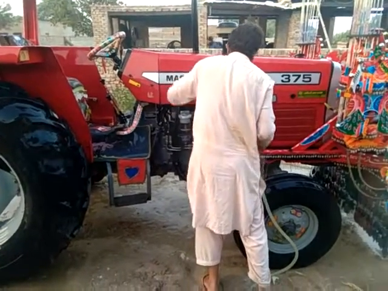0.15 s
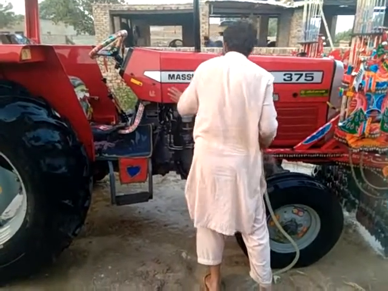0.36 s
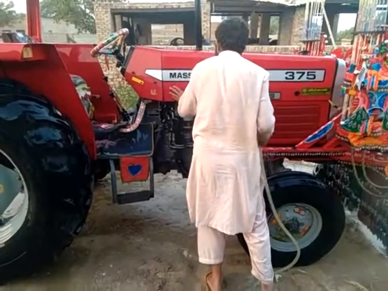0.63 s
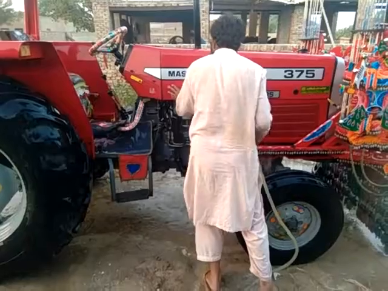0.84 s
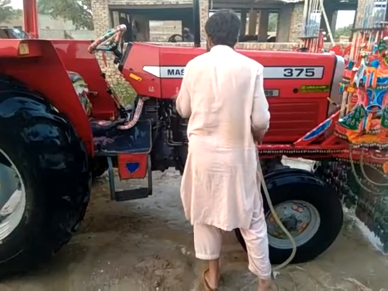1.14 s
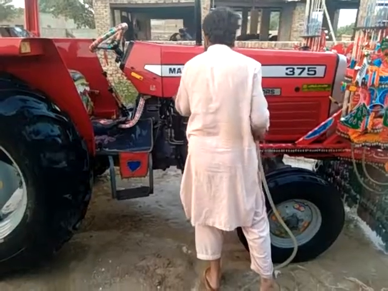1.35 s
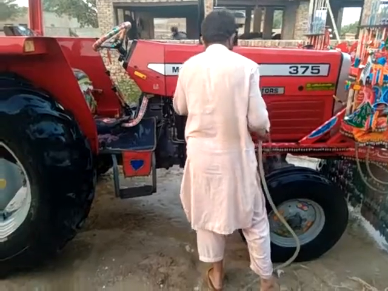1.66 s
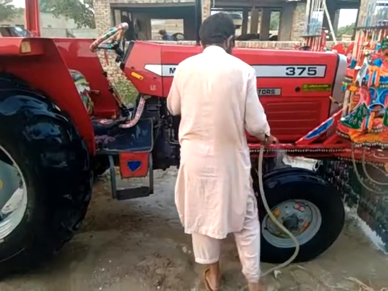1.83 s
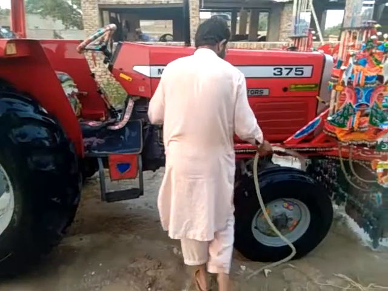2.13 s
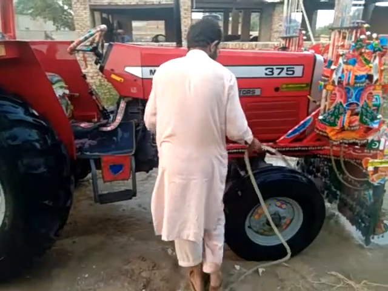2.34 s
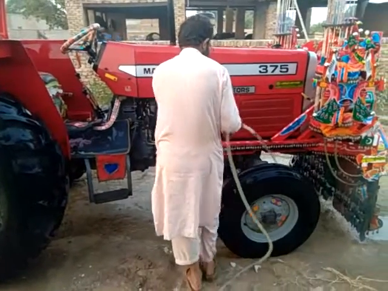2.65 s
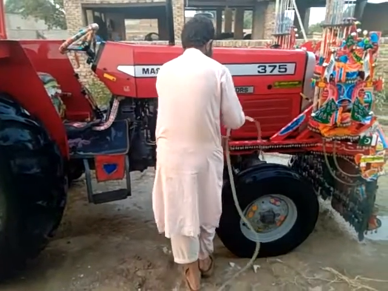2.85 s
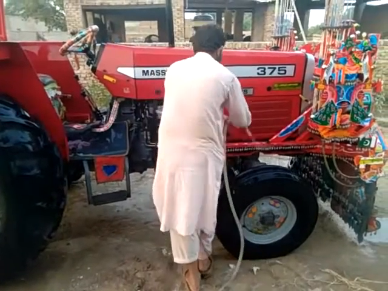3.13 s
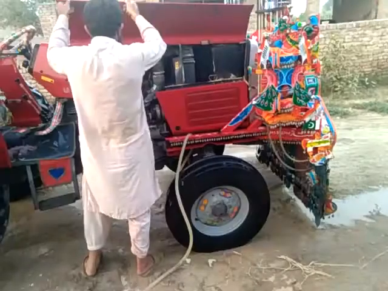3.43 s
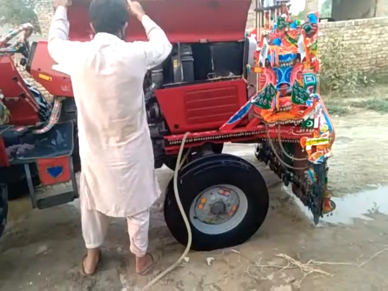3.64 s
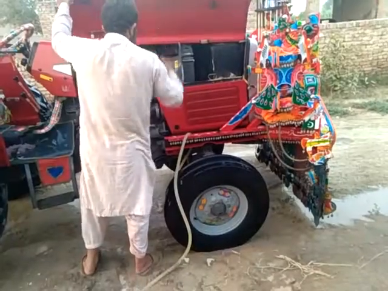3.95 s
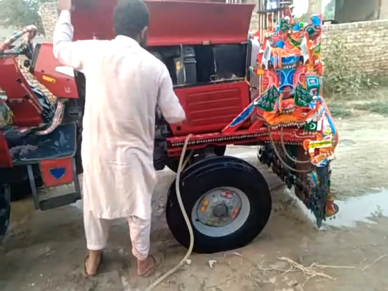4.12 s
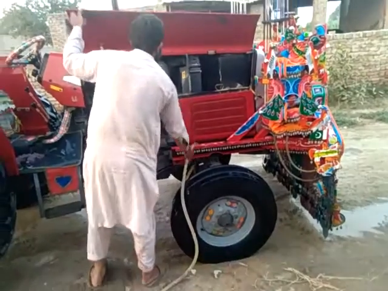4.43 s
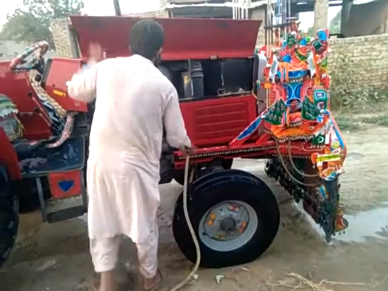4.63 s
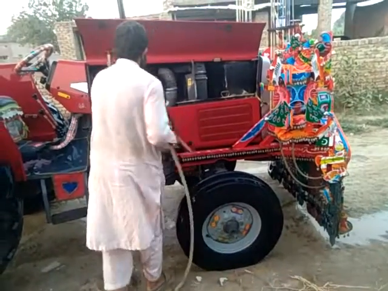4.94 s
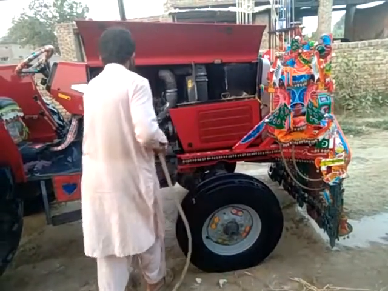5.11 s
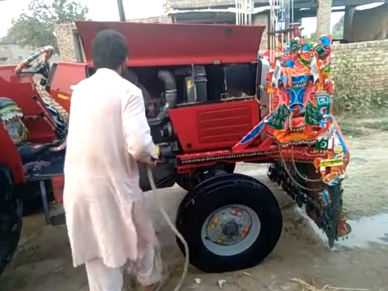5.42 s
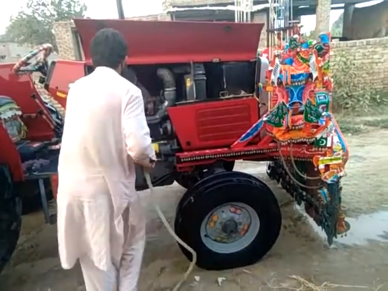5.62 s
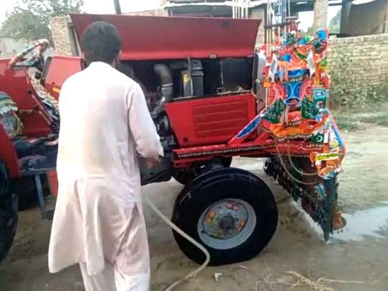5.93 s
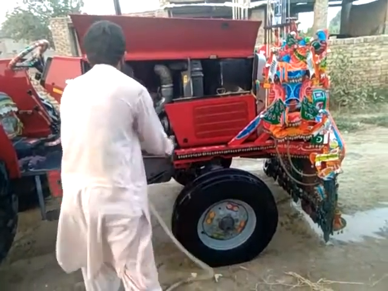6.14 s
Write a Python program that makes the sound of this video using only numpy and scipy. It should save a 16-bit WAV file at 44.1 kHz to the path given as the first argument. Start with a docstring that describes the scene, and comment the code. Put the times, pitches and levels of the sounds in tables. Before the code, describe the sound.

Close, uneven hose spray spatters on metal bodywork and muddy ground, fine hiss above a dull run-off. Sharp slaps of water and bubbly blips punctuate it. After the water thins to a dribble, a faint hinge squeak and soft knock precede one loud steel bang with a short clattering ring. Lesser thuds follow, then isolated spurts. Outdoors, one microphone, weak bass, and a far wavering engine drone.

```python
"""Water from a garden hose spatters over a tractor and the wet ground of an open yard: gush after gush
of ticking drops, hiss and dull run-off over a trickle, with ringing slaps and gliding bubbles.
The flow slackens, the raised sheet-steel bonnet bangs against its stop among lesser knocks and rings
through its panel modes, its hinge squeaks faintly, then separate spurts follow in a new colour.
Behind lie a low noise rumble and a far engine of wavering harmonics; a suppressor ducks the bass."""
import sys
import numpy as np
from scipy import signal
from scipy.io import wavfile
from scipy.ndimage import uniform_filter1d

SR = 44100
rng = np.random.default_rng(int(sys.argv[2]) if len(sys.argv) > 2 else 0)


def unload_wav(signal):
    """Save mono or channel-first audio to the path in sys.argv[1] as 16-bit WAV at rate SR, clipped to [-1, 1]."""
    wavfile.write(
        sys.argv[1],
        SR,
        np.round(np.clip(np.atleast_2d(signal).T, -1, 1) * 32767).astype(np.int16),
    )


N = 276507
TIME = np.arange(N) / SR   # seconds

# gushes of the hose, levels before the layer trims:
# start_s, length_s, splatter_db, brightness_db (spray over splatter), wash_db (run-off)
GUSHES = [(0.01, 0.21, -51, -2, -60.5), (0.308, 0.37, -48, -3, -56), (0.799, 0.047, -51, 0.5, -55),
          (0.938, 0.22, -51.5, 1, -54.5), (1.167, 0.061, -44, -4.5, -57), (1.431, 0.075, -49.5, -1, -55.5),
          (1.574, 0.038, -42.5, -7, -58), (1.682, 0.37, -46.5, -2.5, -60), (2.067, 0.089, -51.5, -3.5, -61),
          (2.234, 0.18, -46.5, -1, -58), (2.431, 0.16, -40, -3.5, -57.5), (2.697, .022, -44.5, -9, -65),
          (2.794, 0.093, -39.5, -10, -54.5), (2.96, 0.35, -42.5, -6.5, -55.5),
          (3.362, 0.043, -42.5, -5, -52.5), (3.416, 0.16, -56, -11, -53.5), (3.94, 0.44, -53.5, -7, -54),
          (4.408, 0.089, -54, -10.5, -53.5), (4.664, 0.062, -49.5, -6.5, -56.5),
          (4.751, 0.078, -49.5, -5.5, -51), (5.004, 0.067, -57, -2, -60), (5.324, 0.1, -57, 0, -56.5),
          (5.441, .065, -46.5, 2, -49), (5.534, 0.13, -50, 2, -54.5), (5.705, .13, -48, 1, -53.5),
          (5.757, 0.022, -41.5, 0.5, -46), (5.873, 0.028, -55.5, 5.5, -54.5), (6.069, .025, -59.5, 3, -66),
          (6.093, 0.095, -49.5, -3.5, -52.5)]
# trickle between the gushes, only a dribble once the hose is let go: time_s, level_db
TRICKLE = [(0, -54.5), (0.75, -55), (0.92, -60), (1.2, -54), (2.0, -53), (2.22, -59.5), (2.45, -55.5),
           (3.4, -53), (3.65, -72.5), (4.95, -75.5), (5.25, -70), (6.27, -74)]
# colour of the water on tractor and ground: pitch_hz, density_db (relative, per Hz)
WATER_COLOUR = [(240, -38), (400, -11.5), (526, -18), (576, -6.5), (670, -11.5), (1070, -10.5),
                (1610, -7.5), (2390, -2.5), (3450, -7), (4070, -8.5), (5950, -13.5), (8300, -25.5),
                (15000, -39)]
# colour of the late spurts: pitch_hz, density_db (relative, per Hz)
SPURT_COLOUR = [(240, -34), (400, -10.5), (518, -8), (602, 0), (690, -3.5), (756, -6.5), (854, -8.5),
                (2150, -1), (3890, -12), (4600, 1), (5770, -8.5), (8180, -22), (15000, -29)]
# gobs of water slapping down: start_s, level_db (before click and droplet trims), pitch_hz, scatter_s
SLAPS = [(0.171, -30.5, 2630, 0.015), (0.306, -36, 2720, .01), (0.636, -33, 2600, 0.017),
         (0.6852, -32, 5440, 0.015), (0.995, -33.5, 2840, 0.0087), (1.0537, -28.5, 2660, 0.016),
         (1.194, -30, 2120, 0.029), (1.2426, -30, 4000, .012), (1.3026, -30.5, 3140, 0.014),
         (1.6884, -34, 4460, .012), (2.154, -32.5, 3300, 0.013), (2.322, -23.5, 2790, 0.02),
         (2.365, -31.5, 2020, 0.0085), (2.509, -35, 2620, 0.049), (2.792, -16.5, 3880, 0.0057),
         (2.8125, -29, 1850, 0.012), (2.853, -26, 2530, 0.017), (5.4786, -24, 1643, 0.0067),
         (6.126, -25, 4840, 0.017), (6.184, -30, 4300, 0.0087)]
# larger bubbles and gurgles: start_s, pitch_hz, level_db, t60_s, glide (octaves per s)
BUBBLES = [(.315, 290, -41, 0.14, 4), (.505, 261, -46, 0.38, -3.5), (.695, 335.6, -45.5, 0.22, -3.5),
           (0.99, 348, -48.5, .45, -0.5), (1.0, 770, -50.5, 0.81, -1), (1.58, 2597, -32, 0.13, 1),
           (1.723, 2210, -25, 0.041, -14), (1.738, 2360, -20.5, 0.08, -2), (1.777, 1980, -34, 0.17, -1.4),
           (4.674, 3200, -44, 0.13, 1), (5.477, 1675, -17, 0.029, 10)]
# knocks of the bonnet: start_s, level_db (relative), hardness_hz (treble corner of the contact)
KNOCKS = [(3.764, -43.5, 5000), (3.899, -22, 905), (3.9025, 4, 12000), (3.941, -6, 220), (4.238, -16, 445),
          (4.436, -33, 2990)]
# strong modes of the bonnet panel: pitch_hz, level_db (relative), t60_s
BONNET_MODES = [(174, -39.5, 0.66), (276.4, -47, 1), (313, -31, 0.83), (343, -36, 0.7), (432, -28.5, 0.44),
                (459.3, -27, 0.54), (595, -33.5, 0.48), (779, -26.5, 0.47), (854, -27, 0.64),
                (902, -27.5, 0.19), (913, -26, 0.52), (961, -22.5, 0.47), (994, -28, 0.54),
                (1210, -31, 0.44), (1193, -35.5, 0.5), (1289, -16.5, 0.15), (1585, -34.5, 0.62),
                (1660, -35, 0.63), (1820, -41, 0.82), (2010, -28, 0.44), (2066, -35.5, 0.97),
                (2610, -26, 0.21), (2750, -24.5, 0.092), (3460, -31, 0.081), (3870, -26, 0.12),
                (3930, -23.5, 0.095), (4030, -17.5, 0.086), (5180, -24.5, 0.16), (5100, -32.5, 0.11)]
# colour of the rattle at each knock: pitch_hz, density_db (relative, per Hz)
CLATTER_COLOUR = [(60, -23), (150, -8), (420, -6), (620, -10.5), (900, -1.5), (1500, -5.5), (2100, -1),
                  (3000, -11.5), (4000, -4.5), (5400, -15.5), (8000, -19), (15000, -45)]
# colour of the panel's dense weak modes: pitch_hz, density_db (relative, per Hz)
SHUDDER_COLOUR = [(60, -12.5), (115, -17.5), (170, 11), (220, -8.5), (320, 0), (620, -3.5), (900, -4),
                  (1150, -1), (2100, -2), (3200, -18.5), (6000, -25), (15000, -48.5)]
# dying of those dense modes: pitch_hz, t60_s
SHUDDER_T60 = [(100, 0.76), (350, 1), (900, 0.71), (2000, 0.62), (5000, 0.73), (15000, 0.27)]
# squeaks of the bonnet hinge: centre_s, half_length_s (to 1/e), pitch_hz, level_db
SQUEAKS = [(3.51, 0.068, 1370, -55), (4.29, 0.14, 1590, -50)]
# background levels: time_s, rumble_db, engine_db
YARD_LEVELS = [(0, -56, -54), (1.0, -54, -60.5), (1.55, -53.5, -53.5), (2.5, -56.5, -60), (3.0, -55.5, -51),
               (3.3, -48.5, -51), (3.55, -57, -61.5), (4.7, -60.5, -66), (6.27, -57.5, -66.5)]
# colour of the yard rumble: pitch_hz, density_db (relative, per Hz)
RUMBLE_COLOUR = [(35, -3), (50, -8.5), (70, -5), (100, -0.5), (155, -5.5), (205, -12.5), (325, -6.5),
                 (430, -14.5)]
# far engine partials: multiple (of the firing rate), level_db (relative)
ENGINE_PARTIALS = [(1, 5), (2, -6), (3, -2), (6, -7)]

OPENED_S, AIMED_IN_S = 3.9, 4.9   # bonnet open; jet aimed into the engine bay
ATTACK_S, SAG_DB_PER_S, RELEASE_DB_PER_S = 0.01, 8, 296   # a gush swells, sags, then dies
USUAL_GUSH_DB = -49.5   # level of an ordinary gush, from which the trickle's hiss falls away
TRICKLE_SPRAY_DB, TRICKLE_WASH_DB = 1, -4
TRICKLE_SPRAY_FOLLOWS = 1.36   # dB of hiss per dB of trickle, so the hiss fades faster
USUAL_SCATTER_S = 0.011   # a gob that scatters for longer lands more softly
ENGINE_HZ = 97.7   # mean firing rate
USUAL_ENGINE_DB, OVERTONES_FOLLOW = -56.5, 0.82   # overtones come up as the engine gets louder
CUTOFF_HZ = 15650


def from_db(db):
    """Decibels to gain."""
    return 10 ** (np.asarray(db) / 20)


def rms_one(x):
    """Scales to rms 1."""
    return x / np.sqrt(np.mean(x ** 2) + 1e-20)


def in_time(rows):
    """Each column of a curve at every sample."""
    s, *columns = np.transpose(rows)
    return [np.interp(TIME, s, c) for c in columns]


def at_hz(points, hz):
    """Reads a table on a log-frequency axis."""
    table = np.array(points)
    return np.interp(np.log(hz), np.log(table[:, 0]), table[:, 1])


def drift(rate_hz):
    """Slow random wander of spread 1: low-passed noise drawn once every 40 samples."""
    r = np.exp(-80 * np.pi * rate_hz / SR)
    noise = rng.standard_normal(N // 40 + 2002)
    slow = signal.lfilter([1], [1, -2 * r, r * r], noise)[2000:]   # past the settling
    return np.interp(np.arange(N) / 40, np.arange(len(slow)), rms_one(slow))


def band(x, low_hz, high_hz):
    """Gentle band-pass."""
    edges = [low_hz, min(high_hz, 0.45 * SR)]
    return signal.sosfilt(signal.butter(2, edges, "band", fs=SR, output="sos"), x + 1e-18)


def thirds(low_hz, high_hz):
    """Roughly third-octave bands: (low edge, centre, high edge)."""
    edges = np.geomspace(low_hz, high_hz, round(3 * np.log2(high_hz / low_hz)) + 1)
    return zip(edges, np.sqrt(edges[1:] * edges[:-1]), edges[1:])


def resonance(x, hz, width_hz):
    """One two-pole resonance with a gain of about 1 on top."""
    r = np.exp(-np.pi * width_hz / SR)
    poles = [1, -2 * r * np.cos(2 * np.pi * hz / SR), r * r]
    return signal.lfilter([1 - r, 0, r - 1], poles, x + 1e-18)


def add(track, s, sound):
    """Mixes a sound into the track at time s."""
    at = max(round(s * SR), 0)
    track[at:at + len(sound)] += sound[:N - at]


def drops(per_s, spread_db, size=N):
    """Random clicks of either sign, many small and a few large; rms 1."""
    heights = from_db(spread_db * np.minimum(rng.exponential(1, size), 4))
    signs = rng.choice([-1, 1], size)
    return rms_one(heights * signs * (rng.random(size) < per_s / SR))


def stream(wash_db=-1.14, splatter_db=0.0, spray_db=-0.25):
    """Fat drops splatter, fine spray hisses, the run-off washes dully."""
    splatter_gain, spray_gain, wash_gain = flow()
    low, middle, high = thirds(400, 1400), thirds(1400, 3600), thirds(3600, 16000)
    wash = spatter(low, per_s=1000, spread_db=1.5, mist_db=2.0, fizz_db=-9, patchy_db=0.9, clump_db=0.15)
    splatter = spatter(middle, per_s=700, spread_db=1.0, mist_db=1.5, fizz_db=-6,
                       patchy_db=3.0, clump_db=1.37)
    spray = spatter(high, per_s=2400, spread_db=0.5, mist_db=1.5, fizz_db=-10.5,
                    patchy_db=2.0, clump_db=2.47)
    low_water = (wash * from_db(wash_db) + drumming()) * wash_gain
    return low_water + splatter * splatter_gain * from_db(splatter_db) + spray * spray_gain * from_db(spray_db)


def flow():
    """Gains of splatter, spray and wash: every gush has one envelope and adds its power to the trickle."""
    trickle_db, = in_time(TRICKLE)
    hiss_db = USUAL_GUSH_DB + TRICKLE_SPRAY_DB + TRICKLE_SPRAY_FOLLOWS * (trickle_db - USUAL_GUSH_DB)
    power = from_db([trickle_db, hiss_db, trickle_db + TRICKLE_WASH_DB]) ** 2
    t = TIME[:SR]
    for s, length, level_db, bright_db, wash_db in GUSHES:
        fall_db = SAG_DB_PER_S * t + RELEASE_DB_PER_S * np.maximum(t - length, 0)
        envelope = np.minimum(t / ATTACK_S, 1) * from_db(-fall_db)
        for layer, layer_db in zip(power, (level_db, level_db + bright_db, wash_db)):
            add(layer, s, (from_db(layer_db) * envelope) ** 2)
    return np.sqrt(power)


def spatter(bands, per_s, spread_db, mist_db, fizz_db, patchy_db, clump_db):
    """Drops tick in all bands at once, leave tiny ringing bubbles and lie on a smooth mist; rms 1."""
    impacts, clumps, out, power = drops(per_s, spread_db), drift(31), 0, 0
    for k, (low, hz, high) in enumerate(bands):
        mist = from_db(mist_db) * rng.standard_normal(N)
        ticks = band(impacts * (-1) ** k + mist, low, high)
        fizz = sum(resonance(drops(45, 6.2), pitch, pitch / 22) for pitch in rng.uniform(low, high, size=3))
        grain = rms_one(rms_one(ticks) + from_db(fizz_db) * rms_one(fizz))
        # aimed into the open engine bay the water meets other surfaces and changes colour
        density_db = np.where(TIME < AIMED_IN_S, at_hz(WATER_COLOUR, hz), at_hz(SPURT_COLOUR, hz))
        colour = np.sqrt(high - low) * from_db(density_db)
        out = out + grain * colour * from_db(patchy_db * drift(25))
        power = power + colour ** 2
    return rms_one(out / np.sqrt(power) * from_db(clump_db * clumps))   # the jet breaks up into clumps


def drumming(level_db=-6, tilt_db_per_octave=-7, wet_width_hz=18, lowest_hz=290):
    """Drops on the closed bonnet keep its modes faintly ringing, damped by the film of water."""
    ringing = 0
    for hz, mode_db, _ in BONNET_MODES:
        if hz < 2100:
            tilt_db = tilt_db_per_octave * abs(np.log2(hz / lowest_hz))
            ringing = ringing + from_db(mode_db + tilt_db) * resonance(drops(600, 1.5), hz, wet_width_hz)
    return from_db(level_db) * rms_one(ringing) * (TIME < OPENED_S)


def slaps(click_cycles=6.8, click_db=-3, broad=1.4, scatter_db=-12, spread_share=0.14):
    """A gob of water lands with a click and scatters into droplets that ring near one pitch."""
    out, t = np.zeros(N), TIME[:SR // 5]
    for s, level_db, hz, scatter_s in SLAPS:
        softness = min(USUAL_SCATTER_S / scatter_s, 1)
        click = np.exp(-t * hz / click_cycles) * np.sin(2 * np.pi * hz * t) * softness
        burst = drops(14000, 1.0, size=len(t))
        pitched = rms_one(resonance(burst, hz, 0.051 * hz))
        droplets = rms_one(pitched + broad * rms_one(band(burst, 2070, 4400)))
        envelope = np.exp(-t / scatter_s) * (1 - np.exp(-t / (spread_share * scatter_s)))
        scatter = droplets * envelope / envelope.max()
        add(out, s, from_db(level_db) * (from_db(click_db) * click + from_db(scatter_db) * scatter))
    return out


def bubbles(swell_s=0.0047, wobble=0.2):
    """Trapped air pockets ring and glide, shaken by the stream."""
    out, t = np.zeros(N), TIME[:SR // 3]
    for s, hz, level_db, t60, glide in BUBBLES:
        phase = 2 * np.pi * np.cumsum(hz * 2 ** (glide * t)) / SR
        shake = wobble * drift(hz / 25)[:len(t)]   # moves both loudness and phase
        envelope = from_db(level_db - 60 * t / t60) * (1 - np.exp(-t / swell_s))
        add(out, s, envelope * (1 + shake) * np.sin(phase + 2 * shake))
    return out


def bonnet(modes_db=-5.0, clatter_db=-17, shudder_db=-31, clatter_t60_s=0.14, rise_s=0.0048,
           build_cycles=2.0, waver=0.84):
    """A knock rattles the hinges, rings the panel's strong modes and leaves a shudder of dense weak ones."""
    out, t = np.zeros(N), TIME[:SR]
    for s, level_db, hard_hz in KNOCKS:
        modes, clatter, shudder, fading = 0, 0, 0, 0
        for hz, mode_db, t60 in BONNET_MODES:
            beat = np.sin(2 * np.pi * (rng.uniform(4.2, 25) * t + rng.random()))   # close mode pairs beat
            build = 1 - np.exp(-t * hz / build_cycles)   # low modes take longer to get going
            tone = np.sin(2 * np.pi * (hz * t + rng.random()))
            modes = modes + from_db(mode_db - 60 * t / t60) * (1 + waver * beat) * build * tone
        for low, hz, high in thirds(50, 16000):
            rattle, dense = band(rng.standard_normal((2, SR)), low, high)
            clatter = clatter + rattle * from_db(at_hz(CLATTER_COLOUR, hz))
            weak_modes = dense * from_db(at_hz(SHUDDER_COLOUR, hz))
            shudder = shudder + weak_modes
            fading = fading + weak_modes * from_db(-60 * t / at_hz(SHUDDER_T60, hz))
        sound = from_db(modes_db) * modes
        sound = sound + from_db(clatter_db - 60 * t / clatter_t60_s) * rms_one(clatter)
        sound = sound + from_db(shudder_db) * fading / np.std(shudder)   # level set before the fade
        soft = np.exp(-2 * np.pi * hard_hz / SR)   # a soft contact loses the treble
        contact = signal.lfilter([1 - soft], [1, -soft], sound * np.tanh(t / rise_s))
        add(out, s, from_db(level_db) * contact)
    return out


def hinge(resonator_width_hz=180):
    """The dry hinge rubs in a narrow band as the bonnet lifts and settles: noise through two resonators."""
    out = 0
    for s, half_length, hz, level_db in SQUEAKS:
        rub = resonance(rng.standard_normal(N), hz, resonator_width_hz)
        rub = rms_one(resonance(rub, hz, resonator_width_hz))
        out = out + from_db(level_db) * np.exp(-((TIME - s) / half_length) ** 2) * rub
    return out


def yard():
    """Low outdoor rumble and the far engine at their changing levels."""
    rumble_db, engine_db = in_time(YARD_LEVELS)
    # the engine level is the peak of a sine of equal power
    return from_db(rumble_db) * rumble() + from_db(engine_db) * far_engine(engine_db) / np.sqrt(2)


def rumble(patchy_db=2.0):
    """Low noise whose bands wander in level independently; rms 1."""
    out = 0
    for low, hz, high in thirds(38.8, 470):
        gain = from_db(at_hz(RUMBLE_COLOUR, hz) + patchy_db * drift(15))
        out = out + band(rng.standard_normal(N), low, high) * gain
    return rms_one(out)


def far_engine(engine_db, waver_db=2.5):
    """Harmonics of the firing rate share one unsteady phase but waver separately in level; rms 1."""
    overtones_db = OVERTONES_FOLLOW * (engine_db - USUAL_ENGINE_DB)
    turns = np.cumsum(ENGINE_HZ * (1 + 0.01427 * drift(6))) / SR
    turns = turns + 0.046 * drift(8.4)   # moving air makes the far drone waver
    out = 0
    for multiple, level_db in ENGINE_PARTIALS:
        partial_db = level_db + (multiple > 1) * overtones_db + waver_db * drift(11)
        out = out + from_db(partial_db) * np.sin(2 * np.pi * multiple * turns)
    return rms_one(out)


def scene():
    """Water, bonnet and yard at one microphone."""
    return (stream() + slaps() + bubbles() + bonnet() + hinge() + yard())[None]


def record(dry, open_db=-55, ratio=3.0, depth_db=19):
    """A noise suppressor ducks the bass when little sounds above it; the top is cut steeply."""
    bass = signal.sosfiltfilt(signal.butter(4, 520, fs=SR, output="sos"), dry)
    upper = dry - bass
    power = uniform_filter1d(upper ** 2, size=SR // 50)   # 20 ms average
    level_db = 10 * np.log10(np.abs(power) + 1e-12)
    duck_db = np.clip(ratio * (level_db - open_db), -depth_db, 0)
    ducked = upper + bass * from_db(duck_db)
    return signal.sosfilt(signal.ellip(10, 0.2, 70, CUTOFF_HZ, fs=SR, output="sos"), ducked)


dry = scene()
out = record(dry)
unload_wav(out)
```